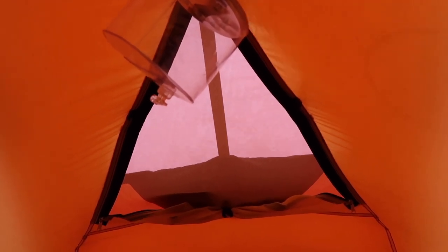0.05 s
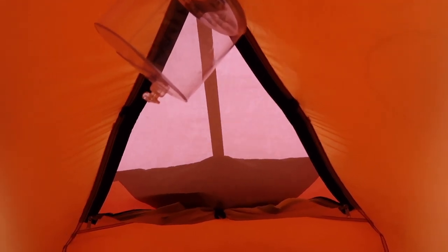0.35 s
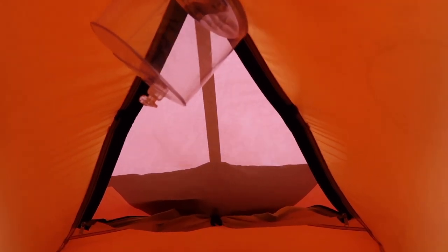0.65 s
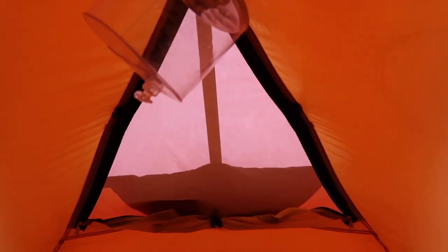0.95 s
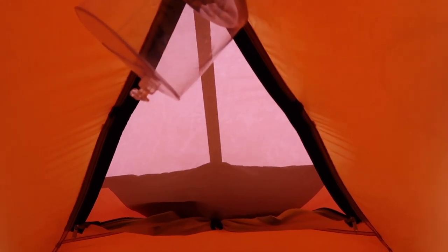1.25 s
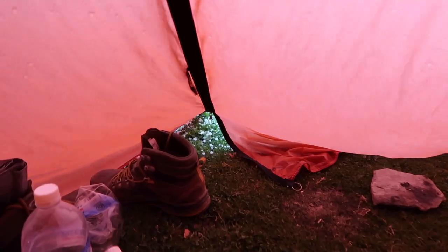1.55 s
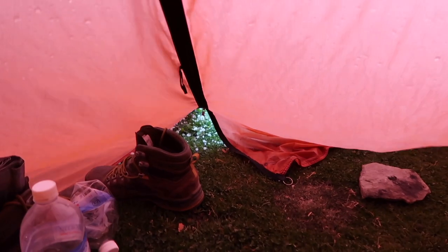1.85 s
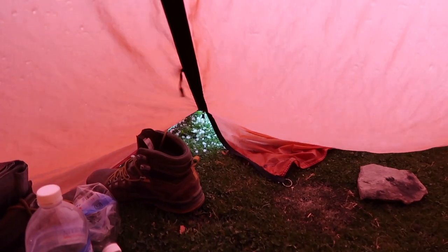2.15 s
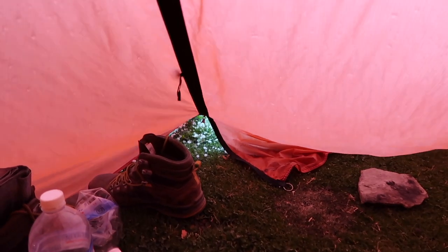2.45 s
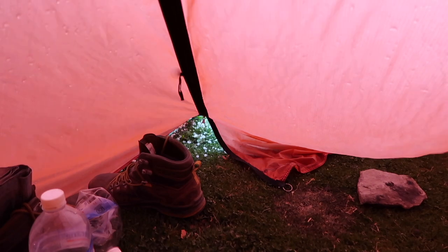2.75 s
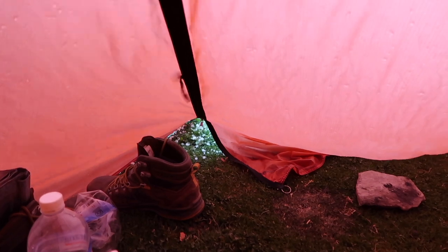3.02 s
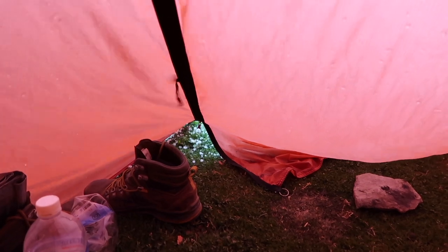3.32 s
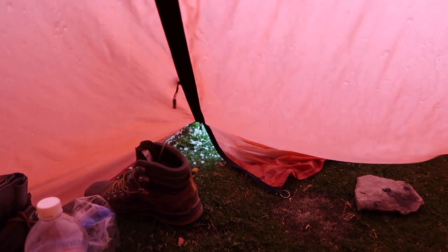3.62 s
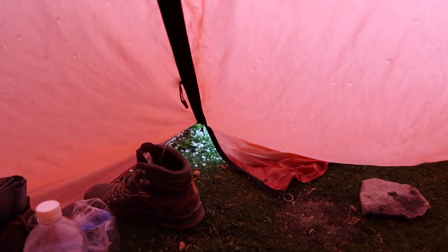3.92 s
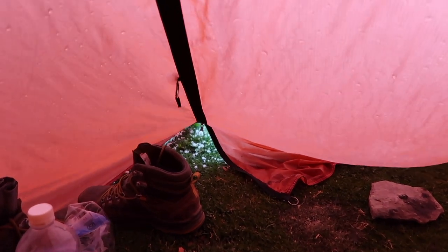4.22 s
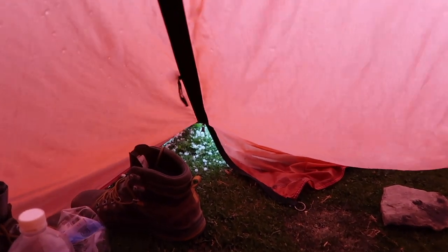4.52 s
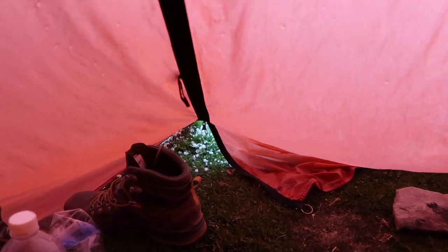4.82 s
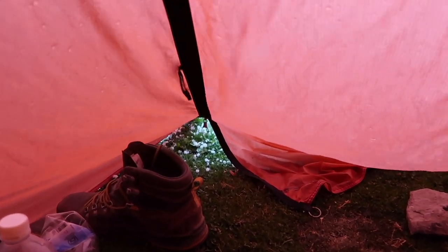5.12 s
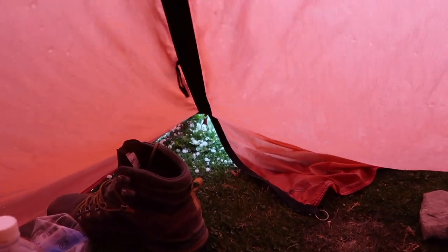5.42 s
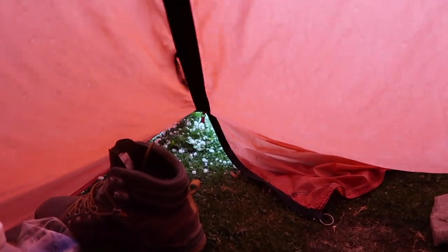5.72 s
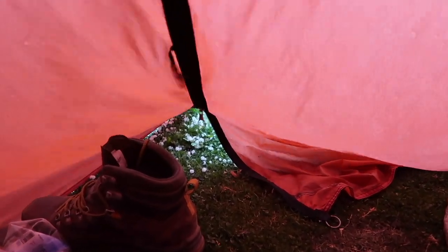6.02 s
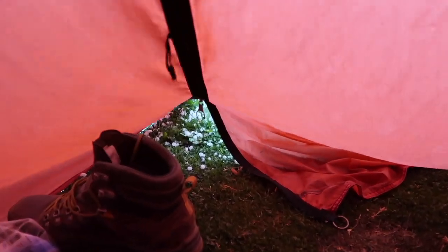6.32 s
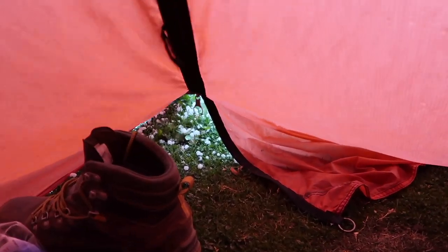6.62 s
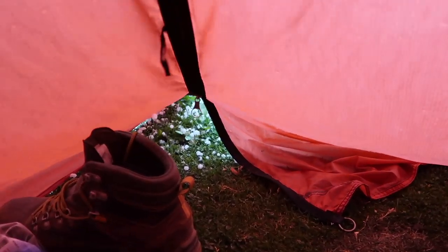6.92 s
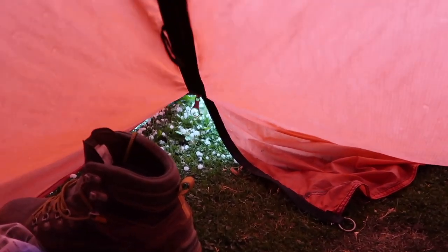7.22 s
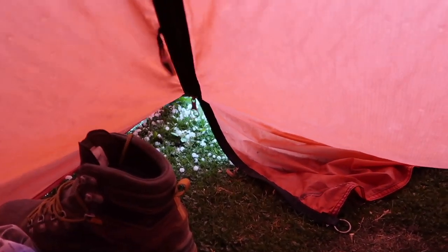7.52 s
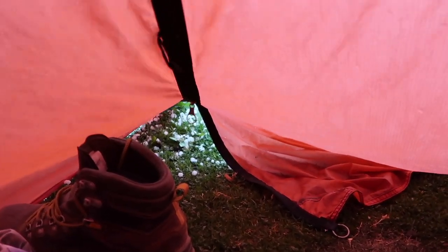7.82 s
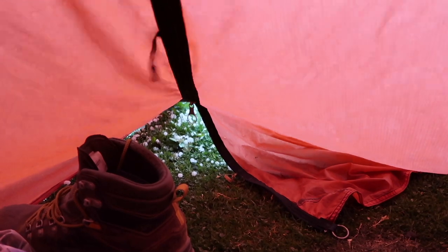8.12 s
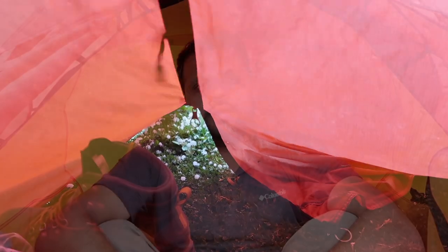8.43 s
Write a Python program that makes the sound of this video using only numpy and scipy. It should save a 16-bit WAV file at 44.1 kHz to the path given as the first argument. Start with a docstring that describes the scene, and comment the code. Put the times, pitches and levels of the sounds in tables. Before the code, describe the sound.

Hail and rain beat on a tent for about eight and a half seconds, heard from inside in close stereo. From the start, fine rain hisses softly on the grass and small drops patter across the roof. Hailstones join at once, mostly a little to the right, each punching the taut fabric with a hollow thump, a short ripple and a wet spatter. The blows are dense and uneven, varying in pitch and strength, and some make a seam ring very briefly. From about 1 second, hard ice occasionally cracks with a bright snap. Near 1.5 seconds the sound drops out for an instant and returns slightly lower. The hail drums on, with sharper snaps around 2.6, 3.1, 3.7 and 6.2 seconds and thicker flurries near 4.4, 5.4 and 7 seconds, easing a little in the last half second.

```python
"""Hail and rain on a tent, heard from inside with a small stereo camera.
From the start, fine rain hisses on the grass and small drops patter on the roof. Hailstones join at
once: each punches the tight cloth with a thump, ripples run through it and the wet surface spatters.
Soon some blows make the seams ring, and from about 1 s hard ice now and then cracks with a bright snap.
Near 1.5 s the level dips briefly and comes back a little lower; the hail drums on to the end."""
import sys
import numpy as np
from scipy import signal
from scipy.fft import rfft, irfft, next_fast_len
from scipy.io import wavfile
from scipy.ndimage import uniform_filter1d

SR = 44100
rng = np.random.default_rng(int(sys.argv[2]) if len(sys.argv) > 2 else 0)


def store_wav(level_fs):
    """Save 16-bit WAV to argv[1]."""
    pcm = np.round(np.clip(np.atleast_2d(level_fs), -1, 1) * 32767)
    wavfile.write(sys.argv[1], SR, pcm.T.astype(np.int16))


N = 377496
SIZE = 4096  # samples in one impact
AGE = np.arange(SIZE) / SR - .008  # seconds since the blow, starting just before it
HZ = np.fft.rfftfreq(SIZE, 1 / SR)
TIME = np.arange(N) / SR
USUAL_PITCH_HZ = 554  # thump pitch on cloth of average tightness

# how hard it rains: t/s, level/dB
RAIN_STRENGTH = [(0.0, -37.5), (0.74, -38.5), (1.31, -36), (1.72, -40.5), (1.98, -37), (2.48, -33),
                 (2.67, -39.5), (2.88, -42.5), (3.12, -33.5), (3.98, -37.5), (4.27, -35.5), (4.36, -35),
                 (5.1, -33.5), (5.48, -36.5), (6.53, -34.5), (7.1, -34.5), (7.27, -37.5), (8.56, -40.5)]
# tone of splashing water: f/Hz, level/dB
SPLASH_TONE = [(150, 4.5), (600, 0), (1500, 3), (2700, 0.5), (5500, -6.5), (8000, -14), (11000, -15),
               (15500, -31)]


def wash(boost_db=3.0, grain_db=3):
    """Countless fine drops on grass and far cloth merge into a soft, grainy hiss."""
    # tone of the rain all around: f/Hz, level/dB
    rain_tone = [(30, -45), (100, -2.5), (250, -2), (650, -7.5), (1600, -12), (3600, -23), (9000, -36),
                 (15000, -50)]
    grains = np.repeat(undb(grain_db * rng.standard_normal(N // 128 + 1)), 128)[:N]
    hiss = stereo(rng.standard_normal((2, N)) * grains, rain_tone)
    return hiss * undb(np.interp(TIME, *np.transpose(RAIN_STRENGTH)) + boost_db)


def drops(count=245, thump_db=6.5, ripple_db=4, wet_db=-6.0, pitch_hz=580, tick_hz=2700):
    """Small drops land at random all over the tent, as hard as it rains; distance dulls them."""
    when = rng.uniform(0, N / SR, count)
    size, pitch, tick, place = rng.standard_normal((count, 4)).T
    db = np.interp(when, *np.transpose(RAIN_STRENGTH)) + 1.5 * size
    rows = np.column_stack([when, db + thump_db, pitch_hz * 2 ** (.5 * pitch), db + ripple_db,
                            db + wet_db, tick_hz * 2 ** (.5 * tick), 2 * place - 2])
    return colour(strikes(rows), [(3000, 0), (10000, -7)])


def hail(usual_pan=-1, pan_scatter=0.63):
    """Each stone lands somewhere on the roof, most of them a little to the right."""
    # the stones that stand out: t/s, thump level/dB, thump f/Hz, ripple level/dB,
    # spatter level/dB, tick f/Hz
    stones = [(0.047, -39, 390, -27, -33.5, 3470), (0.092, -18, 422, -21, -35.5, 2090),
              (0.265, -23, 720, -27, -40.5, 4230), (0.298, -23, 590, -29, -33, 5700),
              (0.35, -7, 500, -20, -56, 1860), (0.371, -17.5, 347, -25, -62, 2820),
              (0.434, -16.5, 221, -24, -28, 1760), (0.442, -18, 348, -22, -32, 1330),
              (0.478, -20, 465, -22, -59, 1330), (0.562, -29, 650, -26, -49, 3200),
              (0.588, -20, 360, -22, -31, 1950), (0.601, -20.5, 388, -36, -63, 1940.0),
              (0.637, -23, 397, -21, -36, 4100), (0.652, -25, 500, -27, -36, 2500),
              (0.677, -27, 484, -27, -52, 3130), (0.707, -11.5, 567, -20, -31.5, 2520),
              (0.886, -48, 700, -22, -31.5, 2740), (0.963, -7.5, 397, -12.5, -31, 2620),
              (0.968, -13, 694, -28, -54, 1700), (0.998, -11.5, 324, -10.5, -39, 2100),
              (1.033, -15, 473, -21, -29.5, 2640), (1.04, -4, 403, -24, -34, 3140),
              (1.056, -27, 645, -24, -36.5, 2520), (1.143, -24, 347, -30, -39, 3870),
              (1.216, -25, 533, -24.5, -43, 2500), (1.295, -19, 300, -20, -35.5, 2160),
              (1.346, -18.5, 520, -21, -35, 2630.0), (1.392, -10.5, 474, -11, -38, 2600),
              (1.407, -9.5, 397, -13, -47, 1550), (1.417, -11, 680, -24, -50, 1550),
              (1.438, -10.5, 466, -20, -42, 1540), (1.447, -10, 680, -16.5, -43, 1580),
              (1.451, -26, 835, -21, -30.5, 1490), (1.472, -22, 456, -24, -37, 1660),
              (1.566, -13.5, 427, -34, -32, 2160), (1.619, -4, 700, -21, -30, 1205),
              (1.636, -11, 1010, -33, -21.5, 2160), (1.703, -40, 850.0, -31, -31.5, 2970),
              (1.75, -25, 540.0, -37, -31.5, 2200), (1.793, -24, 1140, -28, -29.5, 2020),
              (1.813, -27, 560, -24, -31, 2780), (2.069, -11, 446, -17, -32, 2800),
              (2.093, -5, 680, -18.5, -55, 1580), (2.12, -22, 1200, -30, -54, 1470),
              (2.167, -14, 730, -41, -21.5, 1490), (2.193, -14, 456, -27, -40, 1790),
              (2.273, -42, 1620, -29, -22.5, 5300), (2.289, -17, 600, -32.5, -39, 2600),
              (2.302, -11, 427, -40, -44, 1340), (2.347, -17, 390.0, -40, -48, 2260),
              (2.414, -11.5, 440, -16.5, -27.5, 3800), (2.462, -14.5, 348, -14.5, -29.5, 1600),
              (2.486, -30, 700, -21, -30, 2230), (2.496, -12.5, 650, -16, -25, 1550),
              (2.53, -13.5, 410.0, -15.5, -25.5, 3000), (2.575, -16.5, 510.0, -23, -29, 5140),
              (2.604, -9, 414, -18, -20.5, 2870), (2.654, -6.5, 540, -13.5, -26, 1850),
              (2.822, -33, 880.0, -29, -32.5, 2370), (2.84, -12.5, 340, -18, -31, 4140),
              (2.897, -12, 272, -20.5, -40, 5000), (2.907, -18.5, 362, -43, -40, 1230),
              (2.939, -23, 380, -31, -38, 3500), (2.978, -23, 740, -20, -38.5, 1570),
              (3.003, -10, 720, -11.5, -38, 1510), (3.052, -15, 657, -34, -30.5, 1230),
              (3.088, -38, 770.0, -32, -26.5, 4400), (3.098, -12.5, 413, -24, -22, 1750),
              (3.108, -7, 400, -18, -20.5, 2760), (3.174, -36, 710.0, -41, -30, 4140),
              (3.19, -1, 520, -12, -24.5, 1740), (3.228, -20, 486, -29, -43, 3460),
              (3.246, -13.5, 308, -30, -31, 1950), (3.316, -8, 520, -14, -41, 1600),
              (3.427, -14.5, 326, -21, -56, 1660.0), (3.508, -10, 403, -20.5, -39, 1480),
              (3.617, -7.5, 463, -14.5, -25, 1470), (3.64, -18.5, 603, -19.5, -30, 1950),
              (3.728, -29, 700, -28, -25, 3500), (3.737, -5, 540, -20, -23, 2740),
              (3.915, -18, 393, -26, -34, 2880), (3.948, -25, 504, -29, -38.5, 2200),
              (4.089, -16, 1100, -23, -27, 1410), (4.103, -7, 396, -12, -25.5, 1440),
              (4.165, -14, 680, -19, -31.5, 2930), (4.182, -8.5, 637, -9, -27, 2280),
              (4.253, -22, 480, -36, -49, 2200), (4.286, -15.5, 690, -17, -62, 1770),
              (4.307, -16.5, 342, -33, -34.5, 3620), (4.336, -18, 480, -12, -24, 2840),
              (4.36, -12, 418, -23, -32, 1720), (4.367, -7.5, 754, -18, -36, 1520),
              (4.378, -5, 540, -10, -35, 1640), (4.393, -12.5, 473, -17, -32, 1710),
              (4.409, -20, 460, -16, -30, 1540), (4.432, -21, 308, -19, -31, 3630),
              (4.449, -27, 860.0, -42, -29.5, 2820), (4.527, -27, 1100, -17, -21.5, 2150),
              (4.532, -8.5, 696, -11, -24.5, 2070), (4.55, -17.5, 620.0, -33, -29, 1520),
              (4.564, -15, 1300, -33, -30, 1270), (4.576, -21, 1300, -31, -27, 1604),
              (4.626, -11, 630, -16, -23.5, 1480), (4.653, -21, 1100, -39, -42, 1367),
              (4.759, -18, 570, -35, -27.5, 2660), (4.791, -14.5, 473, -14, -23, 3150),
              (4.821, -29, 600, -24, -31.5, 3300), (4.83, -19, 347, -19, -34, 2870),
              (4.855, -17, 830, -19.5, -27, 1220), (4.891, -14.5, 415, -13, -29, 1470),
              (4.912, -8, 596, -18, -49, 1250), (4.993, -16, 810, -11, -25.5, 1310),
              (5.11, -19, 855, -20.5, -26, 3060), (5.144, -10.5, 565, -9.5, -31, 3300),
              (5.157, -4.5, 580, -13, -36, 1610), (5.203, -25, 400.0, -16.5, -29, 3520),
              (5.213, -21, 420, -35, -33.5, 3030), (5.31, -10.5, 260, -26, -31, 3000),
              (5.326, -8.5, 440, -17, -31, 1720), (5.338, -10, 393, -11, -25.5, 2090),
              (5.369, -15, 670.0, -25, -28.5, 3640), (5.38, -13.0, 590, -13.5, -25, 1850),
              (5.405, -12, 900, -11, -37, 1490), (5.412, -13, 540.0, -18, -48, 1230),
              (5.418, -10.5, 590, -11.5, -44, 1800), (5.425, -6.5, 776, -7, -17.5, 1510),
              (5.441, -5.5, 563, -19, -23.5, 1460), (5.489, -18.5, 980, -47, -33, 1720),
              (5.533, -22, 920, -41, -26.5, 1350), (5.56, -10, 650, -26, -33.5, 1200),
              (5.603, -7.5, 890, -13, -38, 1630), (5.629, -19.5, 610.0, -31, -31.5, 3380),
              (5.664, -30, 1290, -28, -33, 1970), (5.739, -15, 404, -28, -29.5, 2900),
              (5.752, -18, 710, -25, -32, 4250), (5.79, -19, 410.0, -14, -28, 5800),
              (5.816, -7, 624, -27, -27, 2400), (5.824, -14.5, 685, -14, -27, 2740),
              (5.856, -14, 710, -23, -31.5, 5570), (5.89, -30, 480.0, -23.5, -31, 2530),
              (5.948, -12, 440, -16, -27.5, 2900), (5.988, -29, 390, -8, -23, 2860),
              (6.005, -15, 483, -28.5, -25, 2920), (6.013, -12, 423, -34, -30, 3280.0),
              (6.05, -13.5, 470, -32, -26, 2900), (6.141, -36, 696, -23, -24, 3300),
              (6.177, -6, 736, -30, -48, 4200), (6.185, -8, 493, -11, -20, 2280),
              (6.215, -16, 664, -17, -25, 3020), (6.249, -22, 333, -13, -32, 2870),
              (6.273, -16, 388, -11, -30, 3200), (6.287, -15.5, 1250, -22, -25, 1700),
              (6.346, -7, 604, -18, -49, 1590), (6.362, -14, 615, -31, -51.5, 1660),
              (6.478, -23, 400, -21, -30, 1930), (6.529, -15, 586, -15, -33.5, 2930),
              (6.579, -5, 580, -12, -33.5, 2500), (6.63, -9.5, 466, -16, -29, 2660),
              (6.645, -14.5, 684, -29, -33, 2300), (6.662, -8, 354, -16, -25, 2510),
              (6.718, -21, 664, -20, -22.5, 1490.0), (6.745, -13.5, 466, -18, -22.5, 1950),
              (6.789, -33, 750.0, -16.5, -30.5, 1590), (6.805, -15, 606, -32, -33, 1550),
              (6.885, -14, 464, -28.5, -35.5, 2870), (6.903, -16, 806, -12, -30, 1200),
              (6.915, -6, 587, -15.5, -25.5, 2480), (6.932, -20, 684, -24, -32, 2350),
              (6.995, -17, 700, -23, -31, 1530), (7.003, -12, 780, -19, -36, 1520),
              (7.034, -36, 680.0, -34, -30.5, 2330), (7.077, -8, 590, -25, -38, 2730),
              (7.111, -23, 740.0, -31, -25.5, 2880), (7.12, -16, 600.0, -40, -53, 2400),
              (7.139, -6.5, 890, -17, -24.5, 1550), (7.162, -20, 705, -21, -40, 1550.0),
              (7.175, -11, 700, -15, -50, 1470), (7.211, -15, 980, -18, -27.5, 2830),
              (7.279, -49, 900, -26.5, -23.5, 2830), (7.354, -20, 690.0, -25, -35, 1610),
              (7.408, -27, 587, -22.5, -37, 1540), (7.464, -7, 640, -25, -25, 1950),
              (7.523, -17, 376, -13, -29, 2710), (7.579, -4.5, 450, -41, -32, 2650),
              (7.655, -17, 550, -36, -32, 5530), (7.758, -14, 252, -14.5, -27, 1400),
              (7.773, -21, 388, -21, -30, 5000), (7.815, -19, 282, -22, -37, 2830),
              (7.848, -3, 480, -12, -26, 1820), (7.875, -25, 725, -19.5, -23, 1700),
              (7.972, -14, 1150, -16.5, -30, 1350), (7.985, -19.5, 510, -31, -35.5, 2630),
              (8.061, -20.5, 387, -21, -35, 2630), (8.118, -6, 800, -14, -24, 1620),
              (8.136, -17, 340, -14, -56, 2760), (8.237, -23, 476, -50, -40.5, 1390),
              (8.318, -48, 600, -23.5, -34, 1940), (8.402, -25.5, 790.0, -22, -32, 1220),
              (8.47, -34, 375, -24, -36.5, 2540)]
    pan = usual_pan + pan_scatter * rng.standard_normal(len(stones))
    return strikes(np.column_stack([stones, pan]))


def strikes(rows):
    """Each blow thumps, ripples and spatters. Rows are as in hail(), plus a pan (above 0 is left)."""
    times_s, thump_db, pitch_hz, ripple_db, spatter_db, tick_hz, pan = np.array(rows).T[:, :, None]
    hits = undb(thump_db) * thump(pitch_hz, tick_hz, pan)
    hits += undb(ripple_db) * ripple(pitch_hz)
    hits += undb(spatter_db) * spatter(tick_hz, spatter_db)
    shade = 2.57 * HZ / (HZ + 500) / (1 + (HZ / 6000) ** 2)  # the camera body blocks middle pitches most
    hits = irfft(rfft(hits) * undb(np.array([pan, -pan]) / 2 * shade))
    return lay_out(hits, times_s[:, 0])


def thump(pitch_hz, tick_hz, pan, cloth_lag_rad=0.62, heave_hz=105, smear_s=0.00039):
    """The dented cloth pulls and pushes the air, faster for a harder stone, and swings back once."""
    push = np.exp(-1.887 * HZ / pitch_hz + 2j * np.pi * HZ * AGE[0] - 1j * cloth_lag_rad)
    swing = HZ ** 2 * push * resonance(230 * (pitch_hz / 500) ** 0.44, width=0.53)
    cushion_hz = 1900 * (pitch_hz / USUAL_PITCH_HZ) ** 1.5  # slack cloth softens the blow to a plop
    hollow_hz = pitch_hz * 2 ** rng.uniform(0, 0.49, pitch_hz.shape)  # each spot has its own note
    plop = (1 + 0.87 * resonance(hollow_hz, width=0.28)) / (1 + (HZ / cushion_hz) ** 4)
    knock = 3.4 * resonance(tick_hz, width=0.11)
    heave = 1 + resonance(heave_hz, width=0.42)  # the whole panel moves under the blow
    smear = np.exp(-1j * np.pi * smear_s * HZ ** 2 / (HZ + 2000))  # each pitch travels at its own speed
    wave = swing * (plop + knock) * heave * smear * near_echoes(len(pitch_hz))
    left_lag_s = .00003 * (0.5 - np.tanh(pan / 2))  # sound from the right reaches the left side later
    left = wave * np.exp(-2j * np.pi * HZ * left_lag_s)
    return burst(irfft(np.array([left, wave])), span_s=0.0065)


def near_echoes(count, bounces=4, echo_db=-10, spread_s=0.00359, above_hz=500):
    """Seams and the ground throw each blow back within a few milliseconds, which makes it hollow."""
    delay, sign = rng.uniform(0, 1, (count, 2, bounces)).transpose(1, 2, 0)[..., None]
    echoes = np.sign(sign - .5) * np.exp(-2j * np.pi * HZ * spread_s * (delay + 0.21))
    return 1 + undb(echo_db) * echoes.sum(0) * HZ ** 2 / (HZ ** 2 + above_hz ** 2)


def ripple(pitch_hz, rise_s=0.0016, fade_s=0.011, linger_s=0.025, linger_db=-18, bunch_db=3.0):
    """Waves scatter through the cloth and come back from the seams in uneven bunches."""
    # tone of the rippling cloth: f/Hz, level/dB
    cloth_tone = [(30, -36), (120, 3.5), (270, 3.5), (400, 2), (800, -4.5), (1150, -10.5), (1550, -15.5),
                  (2200, -21), (9000, -55)]
    age = np.maximum(AGE, 0)
    noise = rng.standard_normal((len(pitch_hz), 3, SIZE)).swapaxes(0, 1)
    bunches = unit(uniform_filter1d(uniform_filter1d(noise[2], size=128), size=128))
    waves = spot_filter(stereo(noise[:2], cloth_tone), patchy_db=4.5, spacing_hz=184.5)
    rise = 1 - np.exp(-age / rise_s)
    fade = np.exp(-age / fade_s) + undb(linger_db) * np.exp(-age / linger_s)
    return burst(tighten(waves, pitch_hz) * rise * fade * undb(bunch_db * bunches), span_s=0.0088)


def spot_filter(x, patchy_db, spacing_hz):
    """Every spot of the cloth favours its own few pitches: random peaks and valleys for each blow."""
    points = 220
    peaks = rng.uniform(-2, 2, (x.shape[1], points))
    place = np.minimum(np.log1p(HZ / 1500) * 1500 / spacing_hz, points - 2)  # wider apart higher up
    below, share = place.astype(int), place % 1
    depth_db = patchy_db / (1 + (HZ / 7000) ** 4)  # wet cloth hardly rings in the top treble
    gain = undb(depth_db * (peaks[:, below] * (1 - share) + peaks[:, below + 1] * share))
    shaped = irfft(rfft(x) * gain)
    return shaped * np.sqrt((x ** 2).sum((0, 2)) / (shaped ** 2).sum((0, 2)))[:, None]  # same energy


def tighten(x, pitch_hz, tilt_db=5.5, low_hz=131, high_hz=1700):
    """Tight cloth ripples brighter and slack cloth darker, at the same level."""
    tightness = np.log2(pitch_hz / USUAL_PITCH_HZ)
    octaves = np.log2(np.clip(HZ, low_hz, high_hz) / low_hz)
    return unit(irfft(rfft(x) * undb(tilt_db * tightness * octaves)))


def spatter(tick_hz, force_db, rise_s=0.00097, fade_s=0.0032, spray_s=0.037, tick_s=0.0035):
    """The film of water bursts into droplets, the stiff cloth ticks and chips of ice bounce back."""
    lead_s = 0.000764  # fast waves in the weave run just ahead of the thump
    age, ahead = np.maximum(AGE + lead_s, 0), np.minimum(AGE + lead_s, 0)
    noise = rng.standard_normal((len(tick_hz), 3, SIZE)).swapaxes(0, 1)
    ice, phase, fizz, *hops = rng.uniform(0, 1, (len(tick_hz), 6)).T[:, :, None]
    hardness = np.tanh((force_db + 16.5) / 6) + ice - .5
    treble = undb(-0.5 * hardness * np.log2(1 + (HZ / 7000) ** 2))
    fizz_peak = 1 + resonance(5000 * 2 ** fizz, width=0.11)  # each splash fizzes at its own pitch
    droplets = stereo(noise[:2] * undb(3.5 * noise[2]), SPLASH_TONE)
    droplets = irfft(rfft(droplets) * treble * fizz_peak)
    droplets = spot_filter(unit(droplets), patchy_db=6.5, spacing_hz=165.5)
    splash = np.exp(ahead / rise_s - age / fade_s)
    spray = undb(-19) * np.exp(ahead / .007 - age / spray_s)
    bounces = undb(-15) * sum(np.exp(-np.abs(AGE - 0.01695 * (hop + 0.28)) / rise_s) for hop in hops)
    side_phase = np.array([-1, 1])[:, None, None] * tick_hz / 6500  # left and right microphone
    tick = np.sin(2 * np.pi * (tick_hz * age + phase) + side_phase)
    tick *= np.exp(ahead / rise_s - age / tick_s) * undb(2) * 2700 / tick_hz  # higher ticks are softer
    return burst(droplets * (splash + spray + bounces) + tick, span_s=0.045)


def seams(rise_s=0.00081, partner_ratio=1.097, partner_db=-11, splash_db=-6, splash_s=0.009):
    """A tight seam rings with two close notes, longer if they are low; high ones flick off water."""
    # blows on seams and hems: t/s, level/dB, f/Hz
    blows = [(0.144, -35, 2320), (0.349, -20, 665), (0.433, -28, 3340), (0.478, -13.5, 377),
             (0.559, -25, 653), (0.586, -22.5, 1970), (0.704, -25, 517), (0.967, -23, 1006),
             (1.33, -27.5, 1750), (1.407, -20, 1560), (1.729, -30, 3960), (1.8, -28.5, 3046),
             (1.889, -36, 4650), (2.039, -28, 3000), (2.346, -28, 2340), (3.133, -27, 3360),
             (3.325, -18, 1570), (3.548, -33, 2410), (4.026, -30, 1141), (4.036, -26.5, 1750),
             (4.088, -20, 4010), (4.184, -16, 1250), (4.732, -30, 3930), (4.992, -12.5, 1015),
             (5.728, -30.5, 4300), (6.348, -24, 1560), (6.484, -25.5, 1160), (6.884, -19, 2720),
             (6.971, -26.5, 2990), (7.198, -28, 2831), (7.511, -27, 3730), (7.652, -20.5, 1054),
             (7.849, -15.5, 1780), (8.468, -26.5, 2450)]
    times_s, db, pitch_hz = np.array(blows, float).T[:, :, None]
    age = np.maximum(AGE, 0)
    offset = 2 * np.pi * rng.uniform(0, 1, (len(blows), 1))
    side_phase = np.array([-1, 1])[:, None, None] * pitch_hz / 7000
    phase = 2 * np.pi * pitch_hz * age + side_phase
    fade_s = 0.0026 * (2700 / pitch_hz) ** 0.39
    notes = np.sin(phase) + undb(partner_db) * np.sin(partner_ratio * phase + offset)
    ring = unit(notes * np.exp(-age / fade_s))
    noise = rng.standard_normal((len(blows), 2, SIZE)).swapaxes(0, 1)
    splash = unit(stereo(noise, SPLASH_TONE) * np.exp(-age / splash_s))
    hits = (ring + undb(splash_db) * np.tanh(pitch_hz / 2700) * splash) * (1 - np.exp(-age / rise_s))
    return lay_out(undb(db) * burst(hits, span_s=0.0094), times_s[:, 0])


def snaps(rise_s=.0004, crack_s=0.00091, chips_s=0.007, chips_db=-16):
    """Hard ice cracks in about a millisecond, each stone at its own high pitch; chips skitter after."""
    # stones that crack on the cloth: t/s, level/dB, f/Hz
    stones = [(1.033, -31, 8400), (1.054, -29.5, 10700), (1.452, -32, 10000), (1.637, -26, 6330),
              (2.165, -29, 5900), (2.605, -19, 5700), (2.896, -33, 9300), (3.097, -18.5, 8950),
              (3.737, -21, 6500), (3.947, -34, 9100), (4.367, -29, 8600), (5.79, -23, 9100),
              (6.183, -21, 6700), (6.789, -30, 8400), (7.428, -35, 9200), (7.465, -24, 5600)]
    times_s, db, pitch_hz = np.array(stones, float).T[:, :, None]
    age, ahead = np.maximum(AGE, 0), np.minimum(AGE, 0)
    shape = np.exp(ahead / rise_s) * (np.exp(-age / crack_s) + undb(chips_db) * np.exp(-age / chips_s))
    noise = rng.standard_normal((len(stones), 2, SIZE)).swapaxes(0, 1)
    bright = stereo(noise, [(1500, -15), (5000, 0), (12500, 0), (15500, -14)])
    cracks = irfft(rfft(bright * shape) * resonance(pitch_hz, width=0.2))
    return lay_out(undb(db) * burst(cracks, span_s=0.0021), times_s[:, 0])


def undb(db):
    """Turn decibels into a number to multiply by."""
    return 10 ** (np.asarray(db) / 20)


def colour(x, points):
    """Shape the tone along a curve of points: f/Hz, level/dB."""
    hz, db = np.transpose(points)
    size = next_fast_len(x.shape[-1])
    log_hz = np.log(np.fft.rfftfreq(size, 1 / SR) + 1)
    gain = undb(np.interp(log_hz, np.log(hz), db))
    return irfft(rfft(x, size) * gain, size)[..., :x.shape[-1]]


def unit(x):
    """Scale each row to an average (rms) level of 1."""
    return x / np.sqrt(np.mean(x ** 2, axis=-1, keepdims=True))


def burst(x, span_s):
    """Give each impact the energy of level 1 held for span_s."""
    return unit(x) * np.sqrt(span_s * SR / SIZE)


def stereo(pair, tone):
    """Mix two noises into left and right of one tone, alike in the bass and wide in the treble."""
    # stereo width of the two microphones: f/Hz, side minus mid level/dB
    width = [(400, -67), (1300, -22.5), (4400, -3), (8000, 3.5), (15000, 16.5)]
    mid = colour(colour(pair[0], tone), [(hz, -10 * np.log10(1 + undb(2 * db))) for hz, db in width])
    side = colour(colour(pair[1], tone), [(hz, -10 * np.log10(1 + undb(-2 * db))) for hz, db in width])
    return unit(np.array([mid + side, mid - side]))


def resonance(hz, width):
    """A filter curve that lets through pitches near hz; the width is a share of hz."""
    s = 1j * HZ / hz
    return width * s / (s ** 2 + width * s + 1)


def lay_out(hits, times_s):
    """Add each stereo impact into the scene at its time."""
    track = np.zeros((2, N + 2 * SIZE))
    starts = ((np.clip(times_s, 0, N / SR) + AGE[0]) * SR).astype(int) + SIZE
    for k, start in enumerate(starts):
        track[:, start:start + SIZE] += hits[:, k]
    return track[:, SIZE:SIZE + N]


def scene():
    """Hailstones, ringing seams and cracking ice over small drops and fine rain."""
    # the level dips briefly and stays a little lower: t/s, level/dB
    dip = [(1.487, 1.5), (1.492, -21), (1.508, -29), (1.514, -8.5), (1.56, -4)]
    return (hail() + seams() + snaps() + drops() + wash()) * undb(np.interp(TIME, *np.transpose(dip)))


def record(dry, bass_hz=72, top_hz=15700):
    """The camera thins the deep bass, overloads on the hardest blows and cuts the highest treble."""
    thinned = signal.sosfiltfilt(signal.butter(1, bass_hz, "high", fs=SR, output="sos"), dry)
    overloaded = np.clip(thinned, -1, 1)
    return signal.sosfilt(signal.ellip(8, .2, 70, top_hz, fs=SR, output="sos"), overloaded)


dry = scene()
out = record(dry)
store_wav(out)
```